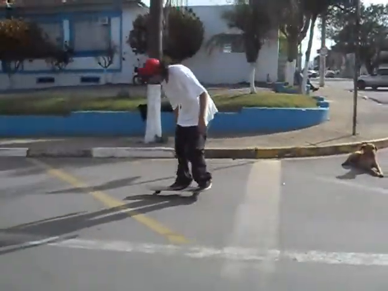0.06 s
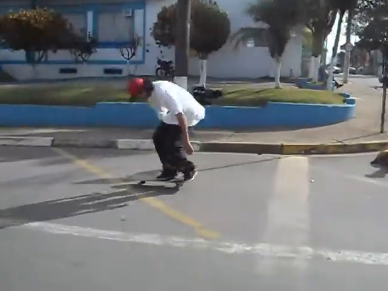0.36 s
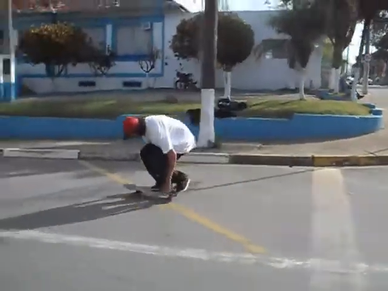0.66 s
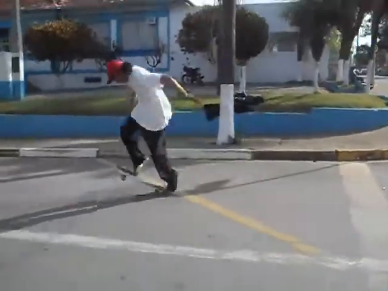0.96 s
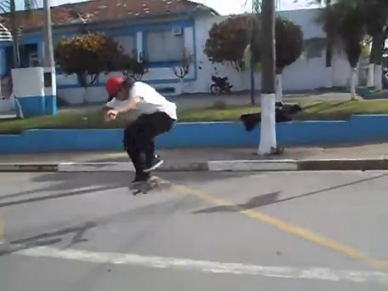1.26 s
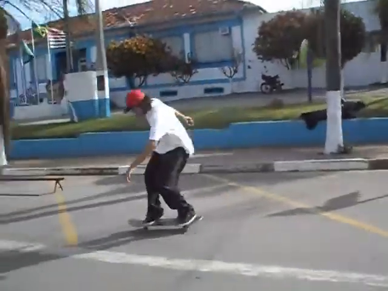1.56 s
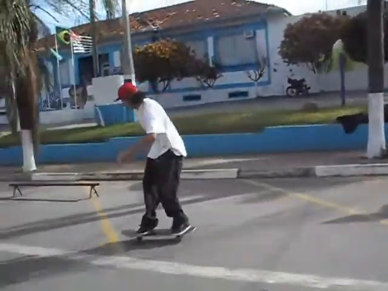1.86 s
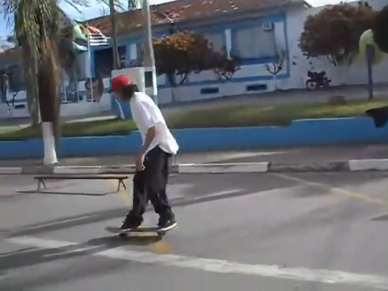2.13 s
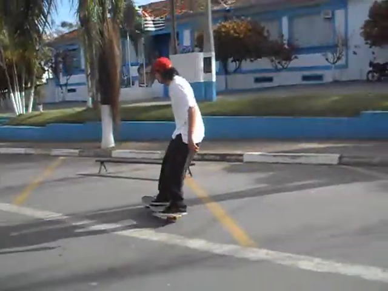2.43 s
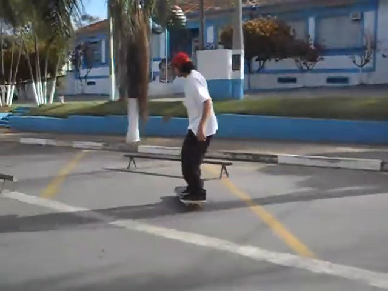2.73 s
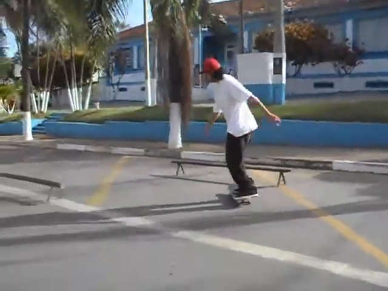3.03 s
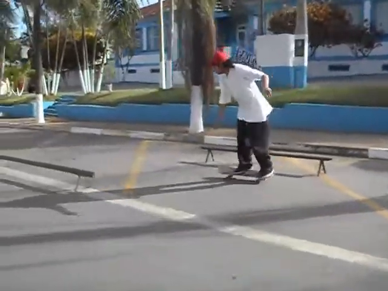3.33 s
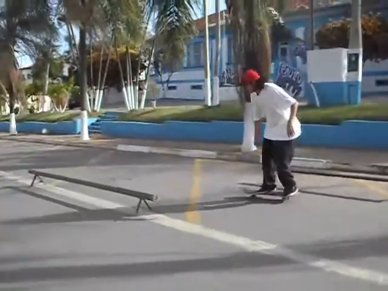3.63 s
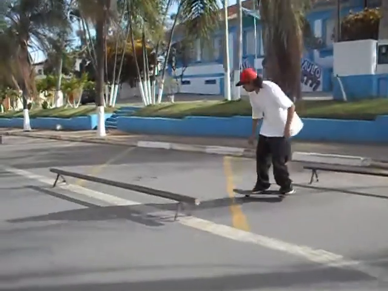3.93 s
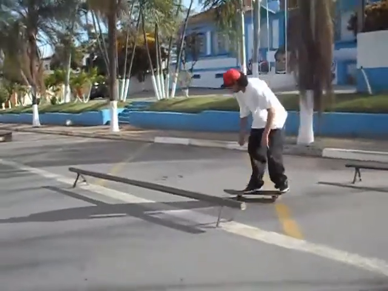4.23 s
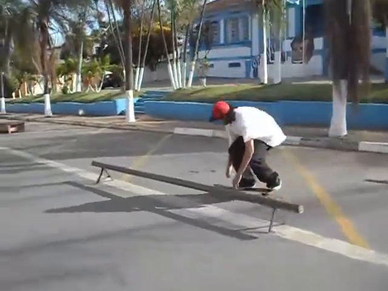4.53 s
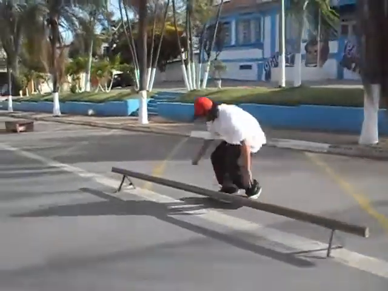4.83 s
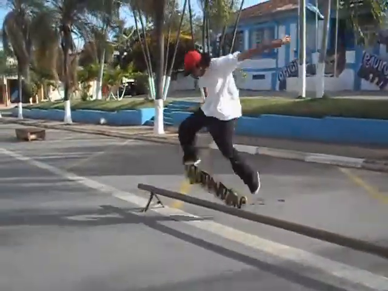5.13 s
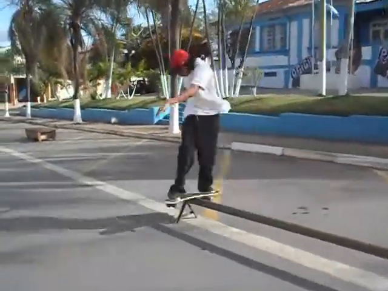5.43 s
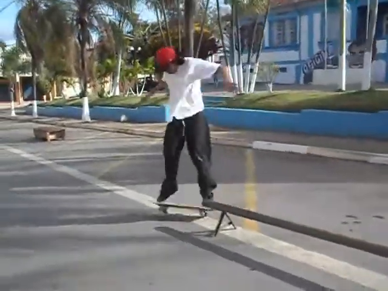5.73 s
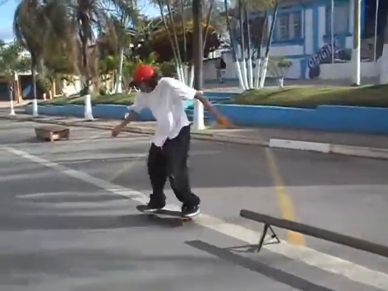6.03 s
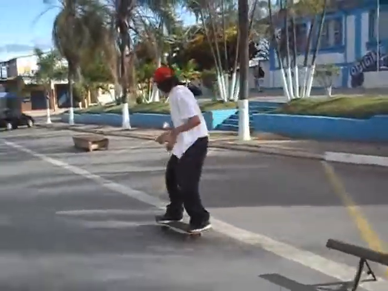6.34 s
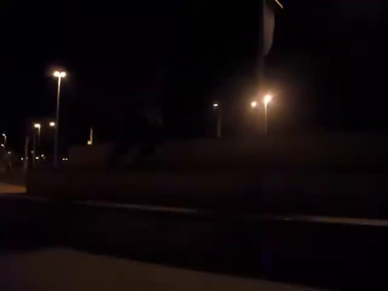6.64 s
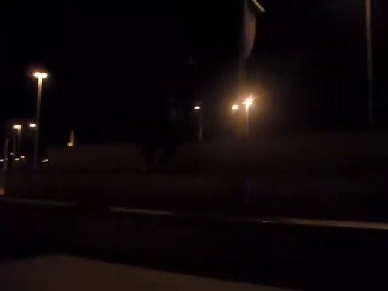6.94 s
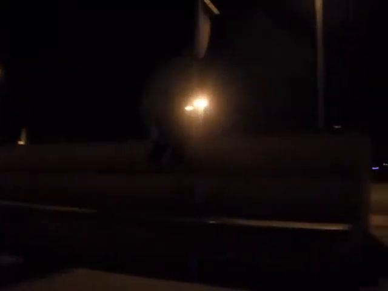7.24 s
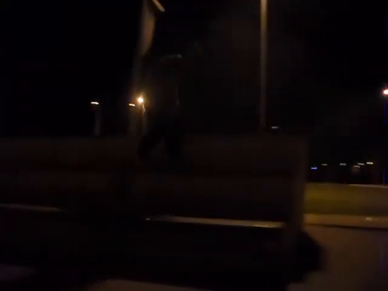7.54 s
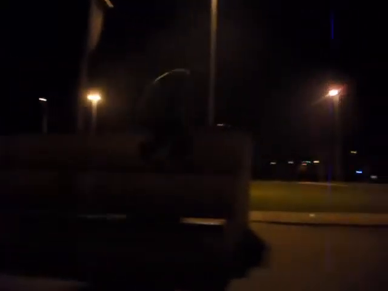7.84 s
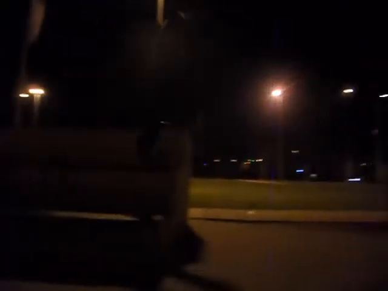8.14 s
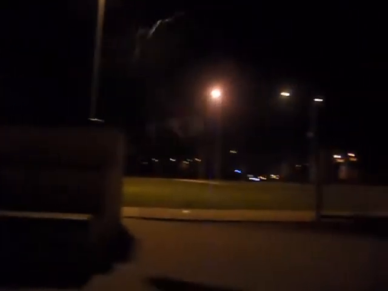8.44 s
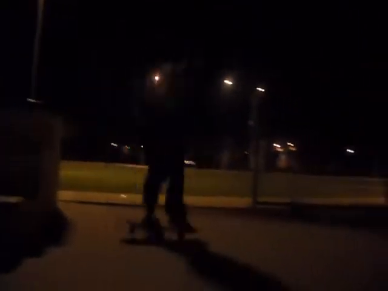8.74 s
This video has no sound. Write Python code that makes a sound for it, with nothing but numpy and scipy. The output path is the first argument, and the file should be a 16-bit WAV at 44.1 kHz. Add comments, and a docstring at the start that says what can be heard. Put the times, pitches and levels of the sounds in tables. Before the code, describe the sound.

A skateboard rolls quietly on an asphalt street, with a low hum and light wind on the microphone. At about 1 second the tail pops sharply, a shoe knocks the board, and the wheels slam down near 1.4 seconds with a short echo off the houses. From 3 seconds the rolling grows rougher, with gritty chatter, dull bumps over seams and small rattles. A second pop comes at 5.1 seconds; the board hits a steel rail with a loud clack and a brief ring at 5.4, then lands at 5.8 and rolls on. At 6.4 seconds everything cuts to a short silence. From 6.6 seconds there is faint outdoor air, a slowly rising low hum and soft rolling on smooth paving. The board pops at about 8.1 seconds and lands with a hard double clack near 8.7.

```python
"""A low hum climbs slowly, wind brushes the microphone, and a skateboard rolls in over asphalt.
Grit rumbles through wheels and deck. In each flip trick the tail pops, feet catch the board, the wheels
slam down and the trucks ring; house fronts echo the clacks. Two tricks come by day, the second striking
a steel rail; after a short silence, a third follows at night on smooth paving."""
import sys
import numpy as np
from scipy import signal
from scipy.fft import rfft, irfft, next_fast_len
from scipy.io import wavfile

SR = 44100
rng = np.random.default_rng(int(sys.argv[2]) if len(sys.argv) > 2 else 0)


def log_audio(samples):
    """Write samples as a 16-bit WAV file to the path given in sys.argv[1]."""
    # one column per channel
    frames = np.atleast_2d(samples).T
    # limit to full scale, then quantise
    limited = np.clip(frames, -1, 1)
    pcm = np.round(limited * 32767).astype(np.int16)
    wavfile.write(sys.argv[1], SR, pcm)


N = 387638
TIME = np.arange(N) / SR
DAY_END_S, NIGHT_START_S = 6.422, 6.602
TOP_HZ = 10600
FREE_DECK_HZ = 786  # thud pitch with no weight on the deck


def undb(db):
    """Decibels to gain."""
    return 10 ** (np.asarray(db) / 20)


def unit(x):
    """Scale to rms 1."""
    return x / np.sqrt(np.mean(x ** 2))


def curves(rows):
    """Each column after the first, joined by straight lines in time."""
    times_s, *columns = np.transpose(rows)
    return [np.interp(TIME, times_s, column) for column in columns]


def since(start_s):
    """Seconds since start_s; zero before it."""
    return np.maximum(TIME - start_s, 0)


def wander(rate_hz):
    """Random drift, spread near 1."""
    knots = rng.standard_normal(2048)
    return np.interp(TIME * rate_hz, np.arange(len(knots)), knots)


def noise(spectrum, size=N, tilt_db=0):
    """Noise of rms 1 shaped by (Hz, dB) points, tilted by tilt_db per octave."""
    hz, db = np.transpose(spectrum)
    points = np.log2(hz)
    fft_size = next_fast_len(size)
    octave = np.log2(np.maximum(np.fft.rfftfreq(fft_size, 1 / SR), 1))
    gain = undb(np.interp(octave, points, db) + tilt_db * np.clip(octave, points[0], points[-1]))
    gain *= octave < np.log2(TOP_HZ)
    return unit(irfft(rfft(rng.standard_normal(fft_size)) * gain, fft_size)[:size])


def resonate(x, hz, width_hz):
    """Steep resonance: one band-pass applied twice."""
    b, a = signal.iirpeak(hz, hz / width_hz, fs=SR)
    return signal.lfilter(b, a, signal.lfilter(b, a, x))


def fade(t, t60):
    """Exponential decay by 60 dB in t60 seconds."""
    return np.exp(-np.log(1000) * t / t60)


def add(track, start_s, sound):
    """Mix a sound into a track."""
    start = int(start_s * SR)
    part = sound[:max(N - start, 0)]
    track[start:start + len(part)] += part


def swells(rows, skirt_db):
    """Short rushes of noise that rise and fall; skirt_db is the level an octave off centre."""
    track = np.zeros(N)
    for middle_s, length_s, db, hz in rows:
        size = int(length_s * SR)
        band = [(hz / 4, 2 * skirt_db), (hz / 2, skirt_db), (hz, 0),
                (2 * hz, skirt_db), (20 * hz, 5 * skirt_db)]
        add(track, middle_s - length_s / 2, undb(db) * np.hanning(size) * noise(band, size))
    return track


def hum(first_db, second_db, third_re_first_db, start_s, start_hz, top_hz, run_up_s=1.72):
    """Low drone of three harmonics, like a distant motor gaining speed."""
    hz = top_hz + (start_hz - top_hz) * np.exp(-since(start_s) / run_up_s)
    phase = 2 * np.pi * np.cumsum(hz * (1 + 0.0052 * wander(20))) / SR
    odd = np.sin(phase) + undb(third_re_first_db) * np.sin(3 * phase)
    return np.sqrt(2) * (undb(first_db) * odd + undb(second_db) * np.sin(2 * phase))


# Hum by day. Each row: time in seconds, relative levels of fundamental and octave in dB.
HUM_LEVELS = [(0.05, -39.5, -55.5), (0.23, -44, -47), (0.33, -47, -52), (0.46, -46, -39.5),
              (0.59, -36.5, -38), (0.71, -40.5, -45), (1.43, -47.5, -36), (1.66, -41.5, -55),
              (1.8, -36.5, -45.5), (2.8, -46.5, -45)]


def day_hum(gain_db=-0.5, fade_db_per_s=7):
    """Fundamental and octave swell and sink, then the hum fades under the rolling."""
    first_db, second_db = curves(HUM_LEVELS)
    drone = hum(first_db, second_db, third_re_first_db=-30, start_s=0, start_hz=75, top_hz=88.6)
    return drone * undb(gain_db - fade_db_per_s * since(HUM_LEVELS[-1][0]))


# Wind spectrum. Each row: frequency in Hz, relative level in dB.
WIND_SPECTRUM = [(15, -5.5), (28, -2), (55, -6), (110, -12.5), (180, -18), (300, -24), (800, -67)]
# Gusts by day. Each row: time in seconds, relative level in dB.
GUSTS = [(0.0, -47.5), (2.17, -49.5), (4.98, -38.5), (5.03, -47), (6.21, -50.5), (6.3, -53)]
# Air puffs. Each row: middle in seconds, length in seconds, level in dB, centre in Hz.
PUFFS = [(4.15, .07, -29, 55), (4.56, 0.078, -29.5, 71), (4.64, 0.042, -28, 68),
         (4.745, 0.0697, -26.5, 114), (4.96, 0.056, -37, 34.8)]


def wind(day_gain_db=3, night_db=-52.5):
    """Gusts buffet the microphone by day; the night is nearly still."""
    gust_db, = curves(GUSTS)
    level_db = np.where(TIME < DAY_END_S, gust_db + day_gain_db, night_db)
    return undb(level_db) * noise(WIND_SPECTRUM) + swells(PUFFS, skirt_db=-11)


# Street air by day and by night. Each row: frequency in Hz, relative level in dB.
DAY_AIR = [(40, -2), (180, 1.5), (300, -2), (700, -10.5), (1200, -11), (2000, -18), (3500, -37.5),
           (6000, -39), (10500, -65.5)]
NIGHT_AIR = [(40, 0), (130, 8), (220, 0.5), (340, -14.5), (430, -9), (650, -13), (1000, -15), (1900, -24),
             (2600, -22), (4000, -26), (7300, -28), (10500, -32)]


def street_air(spectrum, db, breeze):
    """Faint outdoor rush, wavering with the breeze."""
    return undb(db) * breeze * noise(spectrum)


def grit(rate_hz, spread_db):
    """Stones met at random moments: one impulse each, of random size."""
    hits = (rng.random(N) < rate_hz / SR) * rng.choice([-1, 1], N)
    return hits * undb(spread_db * np.clip(rng.standard_normal(N), -2, 2))


# Loaded board under fine and coarse grit. Each row: resonance in Hz, width in Hz, gain in dB.
RUMBLE_MODES = [(224, 89, -5.5), (323.6, 142, -2.5), (492, 208, -6), (614, 111, -3), (701, 67, -2),
                (1069, 323, -15.5)]
CHATTER_MODES = [(611, 400, 3), (1099, 360, 2.5), (1284, 100, -0.5), (1807, 300, -8), (2194, 240, -8)]


def rolling(rumble_db, chatter_db, knock_rate_hz=79.6, chatter_trim_db=-3.5):
    """Fine grit keeps the board rumbling; coarse stones knock the wheels in a fast, uneven chatter."""
    knock_count = np.cumsum(knock_rate_hz * 2 ** (.6 * wander(70))) / SR
    stone_sizes = undb(4 * np.clip(rng.standard_normal(4096), -2, 1.3))
    knocks = stone_sizes[knock_count.astype(int) % 4096] * np.exp(-(knock_count % 1) / .2)
    pressure = unit(.07 + knocks)
    rumble = sum(undb(db) * resonate(grit(1200, 3.3) * (1 + 0.29 * pressure), hz, width_hz)
                 for hz, width_hz, db in RUMBLE_MODES)
    chatter = sum(undb(db) * resonate(grit(6000, 4.2) * pressure, hz, width_hz)
                  for hz, width_hz, db in CHATTER_MODES)
    # Soft urethane takes the edge off each knock.
    chatter = signal.sosfilt(signal.butter(6, 2550, fs=SR, output="sos"), chatter)
    rumble = undb(rumble_db + 1.8 * wander(18)) * unit(rumble)
    return rumble + undb(chatter_db + chatter_trim_db) * unit(chatter)


def wheel_hiss(db):
    """Bearings hiss and sand crackles under the wheels, in small swells."""
    hiss = noise([(1000, 3.5), (2500, 9.5), (4500, 4.5), (8000, 5), (10500, -1.5)])
    return hiss * undb(db + 1.75 * wander(76) + 1.1 * wander(9))


# Rumble by day. Each row: time in seconds, relative level in dB.
RUMBLE_LEVELS = [(0.0, -59.5), (0.92, -54.5), (1.29, -41), (1.74, -49), (2.59, -49), (2.94, -38),
                 (3.29, -41), (3.53, -34.5), (3.81, -39.5), (5.12, -34.5), (5.59, -41), (5.87, -39.5),
                 (6.25, -42)]
# Coarse asphalt. Each row: start in seconds, end in seconds, relative chatter level in dB.
COARSE_STRETCHES = [(1.272, 1.667, -47), (2.837, 3.45, -48.5), (3.5, 4.25, -36), (5.849, 6.421, -40.5)]


def day_ride(rumble_gain_db=1.5, smooth_db=-57, edge_db_per_s=75):
    """Coarse stretches of street bring up the chatter; the hiss rises with chatter and rumble."""
    rumble_db, = curves(RUMBLE_LEVELS)
    chatter_db = smooth_db
    for start_s, end_s, db in COARSE_STRETCHES:
        outside_s = np.maximum(start_s - TIME, since(end_s))
        chatter_db = np.maximum(chatter_db, db - edge_db_per_s * outside_s)
    hiss_db = -60 + 0.073 * (chatter_db - smooth_db) + 0.072 * (rumble_db - rumble_db.mean())
    return rolling(rumble_db + rumble_gain_db, chatter_db) + wheel_hiss(hiss_db)


def sand_patches(rate_hz=12, length_s=0.017):
    """Patches of sand rasp briefly under a wheel."""
    rasp = noise([(1000, -3.5), (2500, 4), (5000, 0), (8500, 1.5), (10500, -5)])
    hits = np.abs(grit(rate_hz, spread_db=2.5))
    return rasp * signal.fftconvolve(hits, np.hanning(int(length_s * SR)))[:N]


# Scuffs. Each row: middle in seconds, length in seconds, level in dB, centre in Hz.
SCUFFS = [(.32, 0.23, -56, 2760), (2.22, 0.24, -62, 6500), (2.98, .22, -39.5, 637),
          (4.63, 0.043, -37, 1060), (5.71, 0.1, -39.5, 1190), (5.69, .1, -54, 5460), (6.97, 0.29, -56, 950),
          (7.1, 0.22, -60.5, 2500), (7.56, .12, -57.5, 3140), (7.88, 0.34, -62.5, 745),
          (8.585, .09, -50, 1205)]


def scuffs():
    """Shoes and wheels scrape in short, rough rushes."""
    return swells(SCUFFS, skirt_db=-15) * undb(3.5 * wander(150))


# Crack spectrum. Each row: frequency in Hz, relative level in dB.
CRACK_SPECTRUM = [(150, -5.5), (500, -1), (1000, 0), (1550, -0.5), (1950, -1.5), (2500, 4), (3200, -4),
                  (4000, -4), (5500, -10), (8000, -16), (10500, -26)]


def maple_crack(t, tilt_db):
    """Maple on asphalt: a dry burst of noise with a fast snap at its front."""
    return noise(CRACK_SPECTRUM, len(t), tilt_db) * (0.73 * fade(t, 0.032) + 0.67 * fade(t, 0.0092))


# Deck and wheel modes. Each row: multiple of the thud pitch, relative level in dB, t60 in seconds.
DECK_MODES = [(.2, -27.5, .07), (0.408, -10.5, 0.047), (1, 2.5, 0.019), (1.14, -16, 0.019),
              (1.898, -18.5, 0.098)]


def deck_thud(t, hz):
    """Struck deck and wheels vibrate in heavily damped modes."""
    return sum(undb(db) * np.sin(2 * np.pi * hz * ratio * t) * fade(t, t60)
               for ratio, db, t60 in DECK_MODES)


# Truck and axle modes. Each row: frequency in Hz, relative level in dB, t60 in seconds.
TRUCK_MODES = [(1005, 3, .2), (1860, 0.5, 0.2), (2270, -6.5, 0.27), (2317, -6, 0.58), (2520, -1, 0.19),
               (2880, -8.5, .3), (3300, -8, .18), (3470, -2, 0.095), (4080, -8.5, 0.26), (4150, -10, 0.23),
               (4440, -13, 0.26), (5000, -7.5, 0.22), (8310, -16, .2)]


def truck_ring(t):
    """Each blow meets the trucks at another spot, so their modes vary."""
    ring = np.zeros(len(t))
    for hz, db, t60 in TRUCK_MODES:
        strength, detune, phase = rng.standard_normal(3)
        cycles = hz * (1 + .004 * detune) * t + phase
        ring += undb(db + 2 * strength) * np.sin(2 * np.pi * cycles) * fade(t, t60)
    return ring


def street_echo(t):
    """Diffuse echo from walls and trees; the treble dies sooner."""
    body = noise([(200, 1.5), (900, 0), (2200, -3), (4200, -7.5), (10000, -25)], len(t)) * fade(t, 0.69)
    treble = noise([(1500, 2), (4000, -1), (10000, -8.5)], len(t)) * fade(t, 0.25)
    return (undb(-11.5) * body + undb(-8) * treble) * (1 - np.exp(-t / 0.0048))


def clack(crack_db, tilt_db, thud_db, thud_hz, ring_db):
    """One blow to the board; ring_db scales truck ring and echo relative to the crack."""
    t = np.arange(16384) / SR
    crack = maple_crack(t, tilt_db)
    ring_and_echo = undb(ring_db) * (undb(-13.5) * truck_ring(t) + street_echo(t))
    contact = 1 - np.exp(-t / 0.00037)
    return contact * (undb(crack_db) * (crack + ring_and_echo) + undb(thud_db) * deck_thud(t, thud_hz))


# Asphalt seams. Each row: start in seconds, thud gain in dB.
SEAMS = [(.571, -33), (1.978, -34), (2.274, -30.5), (2.921, -21.5), (3.003, -24), (3.028, -23.5),
         (3.266, -19), (3.545, -21.5), (3.648, -19.5), (4.511, -23.5), (4.6214, -15), (5.729, -23.5)]


def seam_bumps():
    """A wheel drops into a seam with a dull thud."""
    track = np.zeros(N)
    for start_s, db in SEAMS:
        add(track, start_s, clack(db - 28, tilt_db=-6.5, thud_db=db, thud_hz=645, ring_db=-18))
    return track


# Truck rattles. Each row: start in seconds, gain of the first tick in dB.
RATTLES = [(0.919, -43), (3.0, -47.5), (3.406, -31.5), (3.908, -34.5)]


def truck_rattles(gap_s=.008, drop_db=3.5):
    """Loose hardware gives three bright, fading ticks as the rider shifts his weight."""
    track = np.zeros(N)
    for start_s, first_db in RATTLES:
        for k in range(3):
            db = first_db - k * drop_db
            tick = clack(db, tilt_db=10, thud_db=db - 2, thud_hz=FREE_DECK_HZ, ring_db=-10.5)
            add(track, start_s + k * gap_s, tick)
    return track


# Pops and catches. Each row: start in seconds, crack gain in dB, tilt in dB per octave,
# thud gain in dB, ring and echo gain in dB relative to the crack.
POPS_AND_CATCHES = [(1.047, -17, 3, -35, -8), (1.349, -24.5, 4, -29, -13.5), (1.4367, -21.5, 12, -31, -16),
                    (2.573, -30.5, -5.5, -40, -24), (5.105, -17.5, 1.5, -31, -9),
                    (5.372, -24, .5, -27, -7.5), (5.4379, -9.5, 3.5, -26, -12.5),
                    (5.775, -27.5, 10, -28, -7), (5.795, -23.5, 1, -33, -17),
                    (8.138, -20.5, 1, -27.5, -18.5), (8.536, -30, -1, -50, -22),
                    (8.599, -41, 6, -36.5, -24)]


def flip_tricks(flick_s=1.2):
    """Tail, trucks or shoes strike and leave the board free to ring."""
    track = np.zeros(N)
    for start_s, crack_db, tilt_db, thud_db, ring_db in POPS_AND_CATCHES:
        add(track, start_s, clack(crack_db, tilt_db, thud_db, FREE_DECK_HZ, ring_db))
    # The front shoe flicks the nose into the first flip: a soft, pitched knock.
    add(track, flick_s, clack(crack_db=-30, tilt_db=-3.5, thud_db=-26, thud_hz=1740, ring_db=-18))
    return track


# Axles slamming down. Each row: start in seconds, crack gain in dB, tilt in dB per octave,
# thud gain in dB, thud pitch in Hz, lag of the second wheel in seconds.
AXLE_SLAMS = [(1.413, -18, 7.5, -11.5, 737, .0067), (1.4417, -10, -.5, -14.5, 847, .0046),
              (5.8209, -19.5, 1.5, -19, 698, .0028), (8.7256, -16, 6.5, -10.5, 569, .0018),
              (8.7391, -17.5, 0, -15.5, 670, .003)]


def landings(ring_db=-20.5, hops_s=(.019, .0295)):
    """Each axle lands wheel by wheel, choked by the feet; after the last axle the board hops twice."""
    track = np.zeros(N)
    for start_s, crack_db, tilt_db, thud_db, hz, lag_s in AXLE_SLAMS:
        add(track, start_s, clack(crack_db, tilt_db, thud_db, hz, ring_db))
        add(track, start_s + lag_s, clack(crack_db - 2, tilt_db, thud_db - 2, hz, ring_db))
        last_axle = not any(start_s < other_s < start_s + .5 for other_s, *_ in AXLE_SLAMS)
        if last_axle:
            for hop_s in hops_s:
                add(track, start_s + hop_s, clack(crack_db - 15.5, tilt_db, thud_db - 6.5, hz, ring_db))
    return track


# Rail modes. Each row: frequency in Hz, relative level in dB, t60 in seconds.
RAIL_MODES = [(1800, -1, 0.21), (2229, -2.5, 0.3), (3770, -7, 0.28), (3950, -5, 0.37), (4640, -14, 0.29),
              (5071, -1, 0.23)]


def rail_ring(start_s=5.4378, gain_db=-35.5):
    """The steel rail rings briefly as the board comes down on it."""
    t = since(start_s)
    return sum(undb(gain_db + db) * np.sin(2 * np.pi * hz * t) * fade(t, t60)
               for hz, db, t60 in RAIL_MODES)


def night_ride(takeoff_s=8.03, fade_db_per_s=80):
    """Quiet rolling on smooth paving dies away as the board leaves the ground."""
    drop_db = fade_db_per_s * since(takeoff_s)
    return rolling(rumble_db=-62 - drop_db, chatter_db=-61.5 - drop_db)


def night_hum():
    """The hum wavers and grows as its pitch climbs, the octave fastest."""
    t = since(NIGHT_START_S)
    first_db = -44 + 1.44 * t + 0.7 * wander(5)
    second_db = -53.5 + 5 * t
    return hum(first_db, second_db, third_re_first_db=-19, start_s=NIGHT_START_S, start_hz=72.6, top_hz=83)


def whine(hz=7207, db=-79):
    """Faint, thin tone, wavering slightly in pitch."""
    return undb(db) * np.sin(2 * np.pi * np.cumsum(hz + 6 * wander(33)) / SR)


def scene():
    """Day street, short silence, night plaza; mono."""
    breeze = undb(wander(10))
    day = day_ride() + day_hum() + street_air(DAY_AIR, -51.5, breeze)
    night = night_ride() + night_hum() + street_air(NIGHT_AIR, -49.5, breeze) + whine()
    sand = sand_patches()
    board = scuffs() + flip_tricks() + landings() + seam_bumps() + truck_rattles() + rail_ring()
    board_and_wind = board + wind()
    day += board_and_wind + undb(-57.5) * sand
    night += board_and_wind + undb(-62.5) * sand
    return (day * (TIME < DAY_END_S) + night * (TIME > NIGHT_START_S))[None]


def record(dry):
    """The small camera flattens the hardest landings and cuts the top treble."""
    ceiling = .43
    limited = dry / (1 + (dry / ceiling) ** 4) ** (1 / 4)
    return signal.sosfilt(signal.ellip(8, .2, 70, TOP_HZ, fs=SR, output="sos"), limited)


dry = scene()
out = record(dry)
log_audio(out)
```